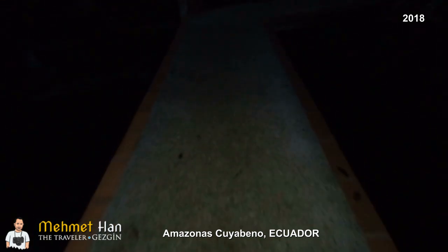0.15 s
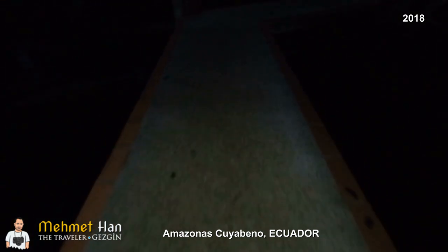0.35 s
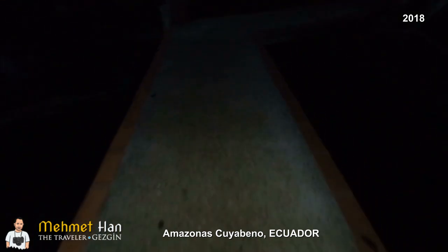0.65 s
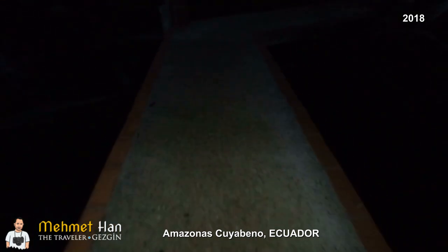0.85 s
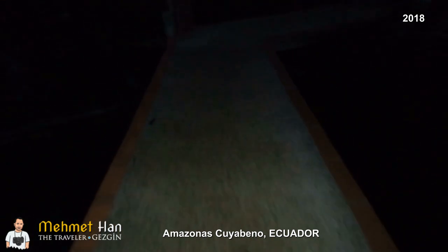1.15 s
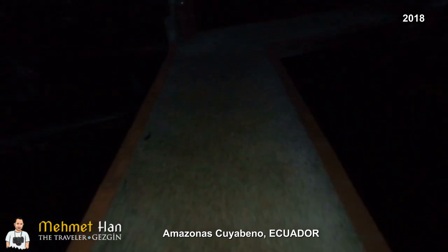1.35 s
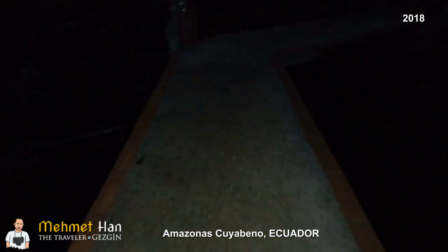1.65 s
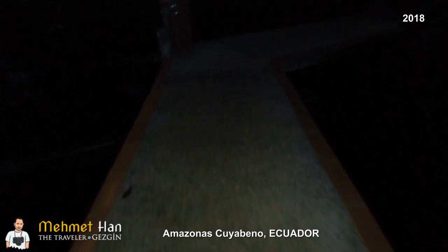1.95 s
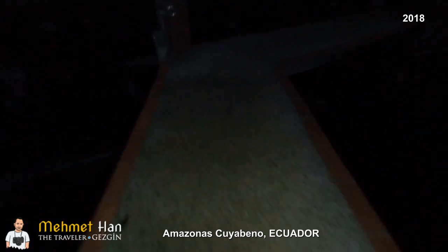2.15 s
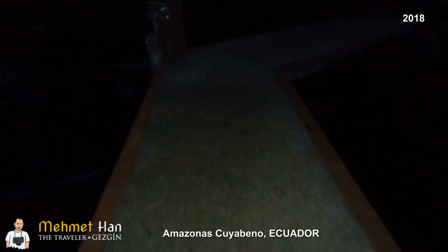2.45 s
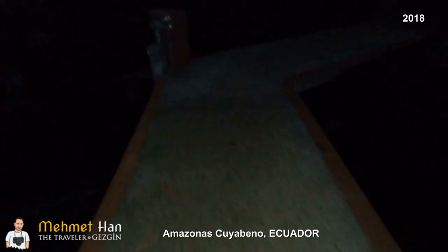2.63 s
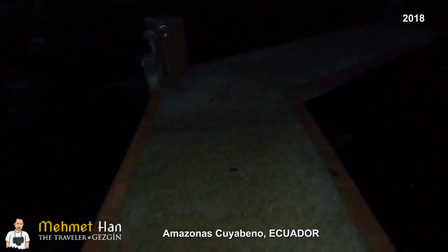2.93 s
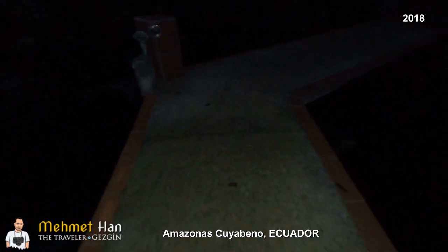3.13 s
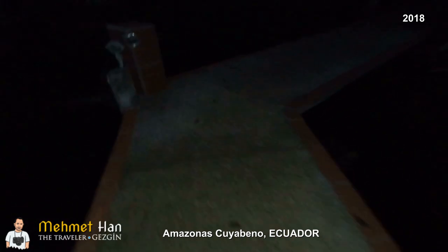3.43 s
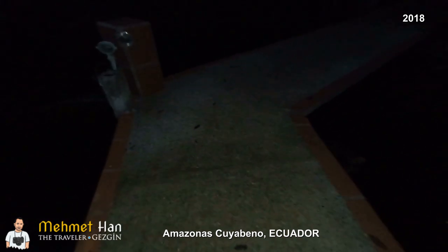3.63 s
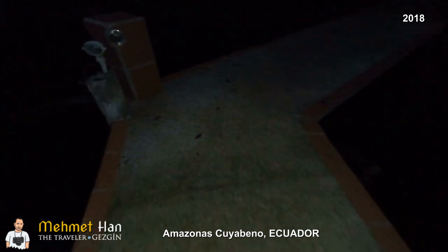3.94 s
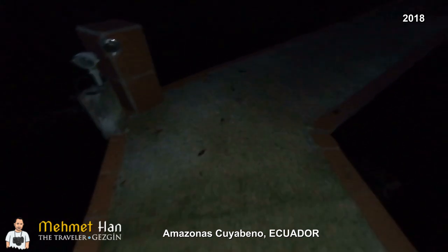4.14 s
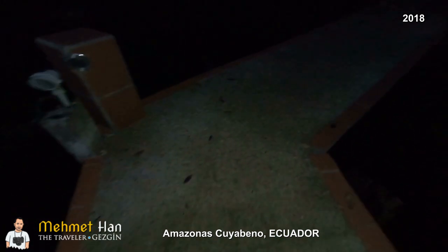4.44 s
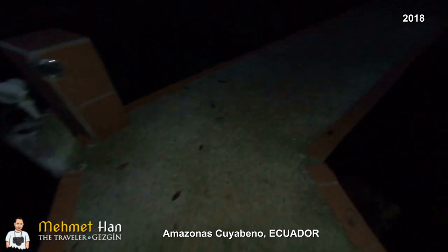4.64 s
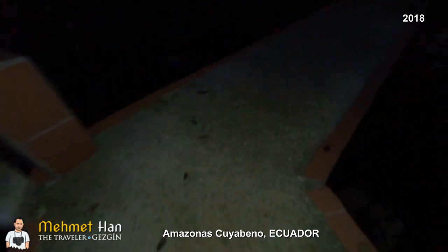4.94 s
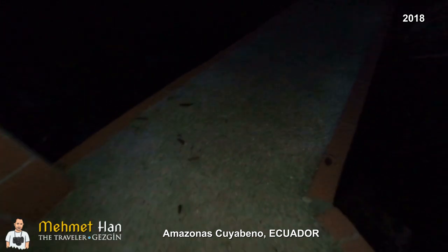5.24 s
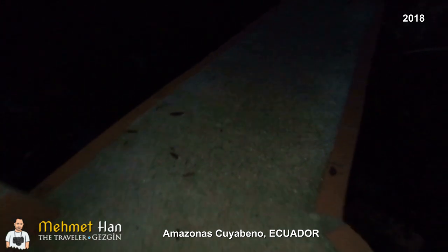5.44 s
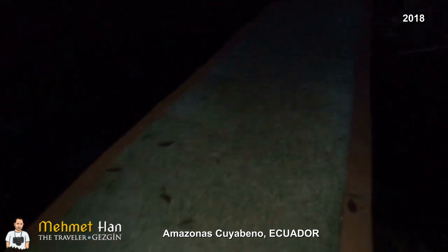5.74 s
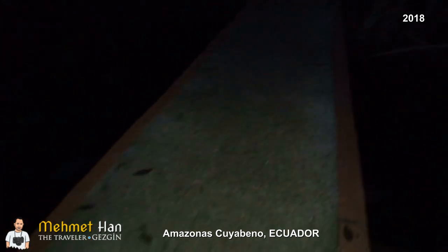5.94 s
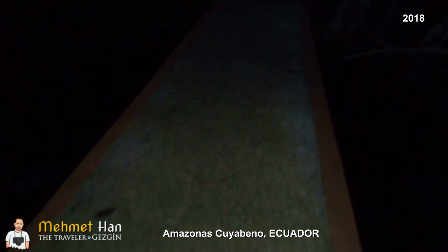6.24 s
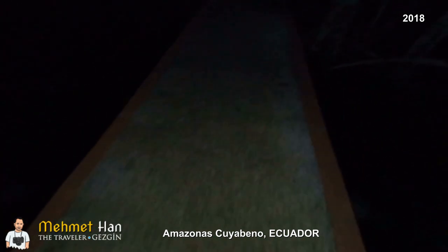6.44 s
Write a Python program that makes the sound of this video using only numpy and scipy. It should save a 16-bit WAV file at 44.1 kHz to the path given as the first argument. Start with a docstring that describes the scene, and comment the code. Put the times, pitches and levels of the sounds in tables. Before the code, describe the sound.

Outdoors in rainforest at night, heard in stereo while walking. Thin insect trills and distant frog notes swell and fade behind closer rasping katydids, quick peeps, brief whistled pairs and a regular clean cricket. Low muffled thuds and housing bumps lean right, heaviest near two seconds; light grit ticks run throughout, with one sharp bright snap shortly before four seconds.

```python
"""In a rainforest at night, crickets, katydids and frogs call near and far over a wash of distant singers.
Far off are shaped noise, thin insect trills, a steady comb-like buzz and overlapping sagging frog notes.
Nearer calls are blurred resonances with a scattered tail; the near cricket is made of clean wing strokes.
A walker carries the recorder along a path: its grip bumps the right microphone, straps and grit tick."""
import sys
import numpy as np
from scipy import signal
from scipy.io import wavfile
from scipy.ndimage import uniform_filter1d

SR = 44100
rng = np.random.default_rng(int(sys.argv[2]) if len(sys.argv) > 2 else 0)


def unload_audio(sound):
    """Save the sound as a 16-bit wav file, at the path given as the first command line argument."""
    columns = np.transpose(np.atleast_2d(sound))
    # keep every value between -1 and 1, then stretch to whole-number steps
    steps = np.round(np.clip(columns, -1, 1) * 32767)
    wavfile.write(sys.argv[1], SR, steps.astype(np.int16))


N = 290178  # length in samples

# Levels of sources are those before panning and before the forest tail is added.
# Spectra of the distant singers, the low air and the treble. Each row: frequency in Hz, relative dB.
FAR_SPECTRUM = [(1380, -68), (2470, -17.5), (2620, -7.5), (2830, -5), (3010, -10.5), (3300, -17),
                (3730, -14.5), (3900, -3), (4230, -3.5), (4540, 1.5), (5200, -9), (5400, -5.5), (5890, 4),
                (6750, 0.5), (7350, -16), (7810, -13.5), (10200, -108)]
AIR_SPECTRUM = [(120, -5.5), (200, -3.5), (387, -13), (538, -14.5), (788, -6.5), (1020, -15), (1430, -19.5),
                (2350, -24.5), (3060, -47.5), (5170, -120)]
TREBLE_SPECTRUM = [(7800, -17), (9300, -1.5), (10500, 12.5), (12600, 8), (15200, -17)]
FAR_DB, AIR_DB, TREBLE_DB = -53, -63, -86.5
PATCHY_DB = 1.8  # drifting louder and softer patches in the far wash and the air
# How alike the washes are at the two microphones. Each row: frequency in Hz, left-right likeness (-1 to 1).
LIKENESS = [(200, -0.33), (600, -0.79), (1100, -0.77), (2300, -0.031), (3900, 0.96), (4600, 0.97),
            (6300, -0.17), (9000, -0.036)]

STRANDS_DB, STRAND_BLUR_HZ = -57.5, 16.3  # distant single insects
DRONE_HZ, DRONE_WIDTH_HZ, DRONE_SPACING_HZ, DRONE_DB = 4942, 300, 71.2, -70
# Thin hisses that swell and fade.
# Each row: start in seconds, level in dB before flutter, length in seconds, pitch in Hz, width in Hz.
HISSES = [(0.811, -70, 0.23, 8200, 2500), (2.09, -68, 0.58, 7640, 690), (3.2, -63, 0.62, 7430, 898),
          (4.019, -64, 0.26, 8800, 2498), (4.103, -66, 0.35, 11700, 2440), (5.414, -70.5, 0.15, 9330, 2940)]
# Path of the far frog chorus. Each row: time in seconds, level in dB, middle pitch in Hz.
FROG_PATH = [(0, -64.5, 2650), (.8, -57, 2743), (1.5, -58.5, 2737), (1.9, -71.5, 2780), (2.6, -53.5, 2694),
             (3, -60, 2731), (3.25, -66, 2680), (4.5, -64.5, 2695), (5.5, -52.5, 2755), (6.05, -65, 2717),
             (6.2, -60.5, 2790)]
# Steady-clocked insect tickers, some fading down or coming up midway.
# Each row: a voice (pitch in Hz, ticks a second, start in turns, gate width in turns,
# blur in Hz, left lead in radians), then its level path (time in seconds, level in dB).
TICKERS = [((4462, 8.73, .1, .3, 22, -.4), [(0, -56), (1.6, -56), (2.2, -59), (6.6, -57.5)]),
           ((4648, 8.74, .18, .3, 22, -.4), [(0, -56), (3.3, -59), (4, -53), (4.8, -53), (5.2, -57),
           (6.6, -57)]), ((5590, 9.65, .4, .95, 90, 1.05), [(0, -51), (1.75, -51), (1.9, -64), (6.6, -66)]),
           ((11700, 9.4, .52, 1.1, 1100, 1.5), [(0, -92), (2.95, -92), (3.2, -78), (6.6, -76)])]

# Ticks of straps and grit. Each row: start in seconds, level in dB, pitch in Hz.
TICKS = [(0.467, -48, 1290), (0.742, -55.5, 1270), (1.257, -53, 900), (1.475, -53.5, 1370),
         (1.958, -50, 880), (2.221, -54.5, 1290), (2.69, -54.5, 800), (2.904, -50.5, 1500),
         (3.481, -46.5, 1340), (3.65, -52.5, 1365), (4.358, -51, 1454), (4.407, -48.5, 1355),
         (4.941, -55, 901), (5.876, -50, 2120), (5.95, -52, 1640), (6.501, -51, 844)]
# Bright snaps. Each row: start in seconds, level in dB, pitch in Hz.
SNAPS = [(.741, -52, 3200), (3.808, -28.5, 4400), (5.927, -49, 3600)]
FAINT_TICKS_DB = (-70, -61)  # range of the many faint ticks scattered throughout
TICK_DAMPING, THUD_DAMPING = 1.7, 0.77  # decay in nepers per cycle
BLIP_AT_S, BLIP_DB, BLIP_START_HZ, BLIP_END_HZ, BLIP_S = 4.353, -53, 640, 930, .062

# Steady hold of the hand on the housing. Each row: time in seconds, level in dB before the lumps.
GRIP_PATH = [(0, -65.5), (1.7, -66), (2.3, -60.5), (5.3, -62), (5.9, -56.5), (6.58, -55)]
# The hand shifts on the housing. Each row: start in seconds, level in dB.
BUMPS = [(.413, -47), (.574, -44), (1.307, -38), (1.42, -38), (1.9, -38.5), (1.993, -21.5), (2.127, -42),
         (2.204, -45), (2.419, -41), (2.565, -44), (2.625, -45), (2.883, -38), (2.956, -44.5),
         (3.08, -46.5), (3.255, -51), (3.411, -48), (3.593, -45), (3.665, -46), (4.07, -40.5), (4.322, -42),
         (4.51, -46.5), (4.61, -50), (4.91, -37.5), (5.46, -35), (5.55, -42), (5.647, -34), (5.715, -41),
         (6.284, -44.5), (6.375, -35)]
# Harder taps on the housing. Each row: start in seconds, level in dB.
KNOCKS = [(2.783, -40.5), (4.812, -40.5), (5.066, -38), (6.041, -38.5)]
# Footfalls jolt the arm. Each row: start in seconds, level in dB, pitch in Hz.
THUDS = [(0.028, -49, 38), (0.649, -52, 35.5), (1.086, -46, 67.6), (1.313, -39.5, 63.5), (1.357, -42, 49),
         (1.99, -21, 104), (2.058, -37, 76), (2.629, -48.5, 60), (3.419, -44, 62), (4.071, -42.5, 69.1),
         (4.209, -44, 70), (5.212, -42, 46.9), (5.673, -37.5, 79), (5.779, -41, 41.2), (5.849, -43, 39.3),
         (6.107, -35.5, 82), (6.278, -44.5, 69), (6.388, -42.5, 59), (6.477, -41.5, 48.7)]
CASE_HZ, CASE_WIDTH_HZ = 143, 28.7  # first housing mode
UPPER_RATIO, UPPER_DB = 1.3, -13  # second housing mode against the first
BUMP_EDGE_DB, KNOCK_EDGE_DB = -19, -2.5  # bright edge against the ring

# Bouts of rasping calls. Each row: start in seconds, level in dB before spread, length in seconds.
RASP_BOUTS = [(.009, -47, .62), (1.161, -47.5, .26), (1.546, -46, .44), (2.428, -47, .62),
              (3.245, -48.5, .62), (4.099, -50.5, .26), (4.637, -48.5, .44), (5.467, -45.5, .09),
              (5.683, -42.5, .09), (6.269, -47.5, .26)]
# Bouts of peeps. Each row: start in seconds, level in dB before spread, length in seconds, base pitch in Hz.
PEEP_BOUTS = [(.06, -54.5, .6, 2608), (.64, -59.5, .9, 2773), (1.05, -62, .5, 2720), (2.2, -46.5, .7, 2787),
              (2.33, -53, .6, 2622), (3.3, -57.5, .7, 2570), (3.535, -53, .8, 2750),
              (4.955, -48.5, .85, 2775)]
# Bouts of hums. Each row: start in seconds, level in dB before spread, length in seconds.
HUM_BOUTS = [(1.218, -59, .28), (5.395, -61, .5)]
# Whistled pairs: a short note, a rest, a longer note. Each row: start in seconds, level in dB.
WHISTLES = [(.748, -49.5), (2.169, -45.5), (3.418, -44), (4.56, -50), (6.105, -52)]
# Single sizzling calls. Each row: start in seconds, level in dB, base pitch in Hz.
SIZZLES = [(.693, -56, 7000), (1.0, -46.5, 6555), (2.161, -46.5, 6650), (2.724, -53.5, 6910),
           (3.123, -53, 6470), (3.441, -42.5, 6570), (4.35, -45, 6710), (5.517, -43.5, 6624)]
# Single croaks. Each row: start in seconds, level in dB, base pitch in Hz.
CROAKS = [(.422, -56, 3900), (.807, -53.5, 3900), (1.401, -54.5, 4050), (1.834, -61, 3990),
          (3.029, -52.5, 3950), (3.47, -51, 3920), (3.834, -51.5, 3917), (5.177, -54.5, 3980),
          (5.398, -50.5, 4075), (5.79, -52, 4094), (6.172, -52, 4080)]
# How each singer calls. Each row: length in seconds, beat in Hz, beat depth (0 to 1), pitch drop in Hz,
# blur in Hz, clear part against the blur, left lead in radians, forest tail in dB,
# and a base pitch in Hz where the calls carry none.
RASP_VOICE = (.125, 48, 1, 0, 35, 1.4, 2.6, -3, 6156)
WHISTLE_VOICE = (.125, 30, .35, 15, 32, 1.4, 1.4, -4, 5790)
SIZZLE_VOICE = (.24, 88, .3, 20, 80, .7, 3.0, -4)
CROAK_VOICE = (.2, 95, .45, 190, 80, 1.3, .3, -1)
PEEP_VOICE = (.085, 70, .3, 120, 35, 1.4, .9, -2)
HUM_VOICE = (.16, 95, 1, -35, 35, .9, .15, -4, 3062)
WHISTLE_SHORT_S, WHISTLE_LONG_AT_S = .05, .066  # length of the first note, start of the second
RASP_EVERY_S, PEEP_EVERY_S, HUM_EVERY_S = .174, .1085, .188  # spacing of calls in a bout
BOUT_SPREAD_DB = -1  # calls of a bout differ a little in strength
CALL_RISE_S, CALL_FALL_S, CALL_FADE_DB = .006, .03, -8

# The near cricket's chirps. Each row: start in seconds, mean level in dB, length in seconds.
CHIRPS = [(0.18, -44, .26), (0.855, -44, .26), (1.555, -41, .31), (2.237, -44, .26), (2.953, -46, .26),
          (3.66, -42.5, .26), (4.34, -45, .26), (5.008, -42.5, .26), (5.701, -42.5, .26), (6.375, -46, .21)]
STROKE_S = .0478  # time from one wing stroke to the next
EDGE_HZ = 15300  # upper band limit


def amp(db):
    """Decibels to amplitude."""
    return 10 ** (np.asarray(db) / 20)


def evened(x):
    """Scales a signal to unit RMS."""
    return x / np.sqrt(np.mean(abs(x) ** 2) + 1e-20)


def tone(turns):
    """A complex carrier from its phase in turns."""
    return np.exp(2j * np.pi * turns)


def curve(rows):
    """Draws each column of a path as straight lines over the whole scene."""
    s, *columns = np.transpose(rows)
    return [np.interp(np.arange(N) / SR, s, c) for c in columns]


def add(mix, s, sound):
    """Lays a stereo sound into the mix at a time, cut at the end."""
    part = mix[:, round(s * SR):][:, :sound.shape[1]]
    part += sound[:, :part.shape[1]]


def wobble(n, width_hz):
    """Complex noise, low-passed twice: the envelope of a narrow band."""
    r = np.exp(-np.pi * width_hz * 1.55 / SR)
    z = rng.standard_normal(n + 4000) + 1j * rng.standard_normal(n + 4000)
    once = signal.lfilter([1], [1, -r], z)
    return evened(signal.lfilter([1], [1, -r], once)[4000:])  # the filter's start-up is cut


def pair(z, pan_db, lead):
    """One source at two microphone ports: left against right in dB, left phase lead in radians."""
    left = (z * np.exp(1j * lead)).real * amp(pan_db / 2)
    return np.array([left, z.real * amp(-pan_db / 2)])


def forest(x, t60=.35):
    """Trunks and leaves scatter a call into a short noisy tail, unlike in each port."""
    t = np.arange(SR // 2) / SR
    tail = rng.standard_normal((2, len(t))) * amp(-60 * t / t60) * (t > .006)
    return signal.fftconvolve(x, tail / np.linalg.norm(tail[0]), axes=1)[:, :N]


def wash(spectrum, db, patchy_db):
    """A wash of noise: random short-time spectra with drifting patches."""
    frames, hz = N // 256 + 5, np.fft.rfftfreq(1024, 1 / SR)
    a, b, c, d, patches = rng.standard_normal((frames, 513, 5)).T
    patches = uniform_filter1d(patches, size=4, axis=0)  # smooth over frequency
    patches = evened(uniform_filter1d(patches, size=16, axis=1))  # then over time
    log_hz = np.log(hz + 1)
    f, level = np.transpose(spectrum)
    level = np.interp(log_hz, np.log(f), level, -99, -99)[:, None]
    f, same = np.transpose(LIKENESS)
    same = np.clip(np.interp(log_hz, np.log(f), same), -1, 1)[:, None]
    left = a + 1j * b
    right = same * left + np.sqrt(1 - same ** 2) * (c + 1j * d)
    z = np.array([left, right]) * amp(level + patchy_db * patches)
    return amp(db) * evened(signal.istft(z, nperseg=1024, noverlap=768)[1][:, :N])


def strands():
    """Many distant insects, each a thin trill at its own pitch and pace that comes and goes."""
    t, out = np.arange(N) / SR, np.zeros((2, N))
    insects = rng.uniform((3750, 8, .3, 0, -1), (3850, 50, 1.5, 1, 2.5), (32, 5))
    for k, (hz, rate, bouts_per_s, turn, lead) in enumerate(insects):
        trill = np.maximum(np.cos(2 * np.pi * rate * t) + 0.53, 0)
        bout = np.maximum(np.cos(2 * np.pi * (bouts_per_s * t + turn)) + 1.3, 0)
        carrier = wobble(N, STRAND_BLUR_HZ) * tone((hz + 100 * k) * t)  # pitches climb by about 100 Hz
        out += pair(trill * bout * carrier, -0.2, lead)
    out = amp(STRANDS_DB) * evened(out)
    return out + forest(out)


def drone():
    """A steady far buzz: a comb of seven thin, fluttering lines, strongest at the centre."""
    t = np.arange(N) / SR
    comb = 0
    for k in range(-3, 4):
        weight = 1 / (1 + (2 * k * DRONE_SPACING_HZ / DRONE_WIDTH_HZ) ** 2)
        comb = comb + weight * wobble(N, 14) * tone((DRONE_HZ + k * DRONE_SPACING_HZ) * t)
    out = pair(amp(DRONE_DB) * comb, -0.33, 1.0)
    return out + forest(out)


def hisses():
    """Wide noise bands under a smooth swell, their noise unrelated in the two ports."""
    out = np.zeros((2, N))
    for s, db, length, hz, width in HISSES:
        n = round(length * SR)
        band = np.array([wobble(n, width) for port in "LR"]) * tone(hz * np.arange(n) / SR)
        flutter = amp(3.3 * wobble(n, 10).real)
        add(out, s, amp(db) * np.hanning(n) ** 0.88 * flutter * band.real)
    return out


def frogs():
    """Several far frogs repeat a short sagging note, each at its own pace, and overlap into one band."""
    db, hz = curve(FROG_PATH)
    t, out = np.arange(N) / SR, np.zeros((2, N))
    for rate, start, offset_hz, lead in rng.uniform((8, 0, -105, -2), (11, 1, 90, 2), (10, 4)):
        place = (rate * t + start) % 1  # position within the note, 0 to 1
        note = np.sin(np.pi * place) ** .8 * (.8 + wobble(N, 32))
        pitch = hz + offset_hz - 110 * (place - .5)
        out += pair(note * tone(np.cumsum(pitch) / SR), -0.96, lead)
    out = amp(db) * evened(out)
    return out + amp(-12.0) * forest(out)


def ticker(voice, level):
    """A blurred resonance swells once on every turn of a steady clock, its level following a path."""
    hz, rate, turn, share, blur_hz, lead = voice
    t = np.arange(N) / SR
    place = (rate * t + turn + .5) % 1 - .5  # turns from the middle of the tick
    gate = np.cos(np.pi * np.clip(place / share, -.5, .5))
    out = pair(amp(curve(level)[0]) * gate * wobble(N, blur_hz) * tone(hz * t), -2.2, lead)
    return out + amp(-3) * forest(out)


def small_things():
    """Short ticks, the main ones each followed by three weaker ones, scattered faint ticks, snaps and a blip."""
    out, t = np.zeros((2, N)), np.arange(800) / SR
    faint = rng.uniform((0, FAINT_TICKS_DB[0], 700), (N / SR, FAINT_TICKS_DB[1], 2000), (30, 3))
    crumbs = []
    for s, db, hz in TICKS:
        for late, less_db, ratio in rng.uniform((.006, -16, .6), (.045, -8, 1.5), (3, 3)):
            crumbs.append((s + late, db + less_db, hz * ratio))
    for s, db, hz in [*TICKS, *crumbs, *faint]:
        decay = TICK_DAMPING * t * hz
        add(out, s, pair(amp(db) * decay * np.exp(1 - decay) * tone(hz * t), -11, 0.09))
    for s, db, hz in SNAPS:
        burst = np.exp(-((t - .001) / .00035) ** 2)
        add(out, s, pair(amp(db) * burst * tone(hz * t), -1, .1))
    t = np.arange(round(BLIP_S * SR)) / SR
    turns = np.cumsum(BLIP_START_HZ + (BLIP_END_HZ - BLIP_START_HZ) * t / BLIP_S) / SR
    shape = amp(BLIP_DB - 10 * t / BLIP_S) * signal.windows.tukey(len(t), .12)
    add(out, BLIP_AT_S, pair(shape * tone(turns), -.5, .1))
    return out + amp(-9) * forest(out, t60=.1)


def grip():
    """A held housing rings at two low modes over a lumpy rumble, mostly in the right port."""
    t = np.arange(N) / SR
    ring = 0
    for ratio, db in ((1, 0), (UPPER_RATIO, UPPER_DB)):
        ring = ring + amp(db) * wobble(N, CASE_WIDTH_HZ) * tone(CASE_HZ * ratio * t)
    rumble = np.array([wobble(N, 35) for port in "LR"]) * tone(40 * t)
    rumble = np.array([0.37 * rumble[0], rumble[1]]).real
    lumps = amp(curve(GRIP_PATH)[0] + 7.1 * wobble(N, 26.0).real)
    return lumps * (pair(amp(-5) * ring, -14.0, -1.1) + rumble)


def handling():
    """Bumps, knocks and footfalls ring down through the housing, mostly to the right port."""
    out = grip()
    t = np.arange(9000) / SR
    rise = 1 - np.exp(-(t / 0.011) ** 2)
    edge = (1 - np.exp(-(t / 0.0028) ** 2)) * np.exp(-250 * t) * tone(245 * t)
    for hits, edge_db in ((BUMPS, BUMP_EDGE_DB), (KNOCKS, KNOCK_EDGE_DB)):
        for s, db in hits:
            turns = CASE_HZ * rng.uniform(0.9, 1.06) * t
            upper = amp(UPPER_DB) * tone((UPPER_RATIO - 1) * turns + rng.random())
            body = rise * np.exp(-55 * t) * tone(turns) * (1 + upper)
            hit = amp(db) * (body + amp(edge_db) * edge)
            add(out, s, pair(hit, -19.0, -1.98 + rng.standard_normal()))
    for s, db, hz in THUDS:
        thud = amp(db) * rise * np.exp(-THUD_DAMPING * hz * t) * tone(hz * t)
        add(out, s, pair(thud, -18, -0.47 + rng.standard_normal()))
    return out


def bouts(rows, every_s):
    """Spells each bout out as evenly spaced calls."""
    calls = []
    for s, db, length, *hz in rows:
        for late in np.arange(0, length, every_s):
            calls.append((s + late, db + BOUT_SPREAD_DB * rng.standard_normal(), *hz))
    return calls


def singer(calls, voice):
    """A wing or throat resonance, beaten by the teeth of a file and blurred by leaves."""
    length, beat_hz, depth, drop_hz, blur_hz, clear, lead, wet_db, *usual_hz = voice
    out, t = np.zeros((2, N)), np.arange(round(length * SR)) / SR
    shape = np.clip(np.minimum(t / CALL_RISE_S, (length - t) / CALL_FALL_S), 0, 1)
    for s, db, *hz in calls:
        pitch = (hz + usual_hz)[0] + drop_hz * (np.exp(-t / 0.035) - .45)
        # full depth splits the line in two
        buzz = evened(1 - depth + depth * np.cos(2 * np.pi * (beat_hz * t + rng.random())))
        z = buzz * evened(clear + wobble(len(t), blur_hz)) * tone(np.cumsum(pitch) / SR)
        add(out, s, pair(amp(db + CALL_FADE_DB * t / length) * shape * z, -2, lead))
    return out + amp(wet_db) * forest(out)


def cricket():
    """The near cricket: clean wing strokes, each sagging a little in pitch."""
    out = np.zeros((2, N))
    t = np.arange(round(0.024 * SR)) / SR
    for s, db, length in CHIRPS:
        for start in np.arange(0, length, STROKE_S):
            size_db, hz, pan_db = rng.standard_normal(3) * (1.5, 7, 1.0) + (db, 4635, -1.2)
            stroke = amp(size_db) * signal.windows.tukey(len(t), .6) * tone(hz * t - 1300 * t ** 2)
            add(out, s + start, pair(stroke, pan_db, 0.082))
    return out + amp(-7) * forest(out)


def scene():
    """The far bed, the sounds at the recorder and the nearer callers together."""
    far = wash(FAR_SPECTRUM, FAR_DB, PATCHY_DB) + wash(AIR_SPECTRUM, AIR_DB, PATCHY_DB)
    far += wash(TREBLE_SPECTRUM, TREBLE_DB, patchy_db=-4.0)
    far += strands() + drone() + hisses() + frogs()
    long_notes = [(s + WHISTLE_LONG_AT_S, db) for s, db in WHISTLES]
    calls = ((bouts(RASP_BOUTS, RASP_EVERY_S), RASP_VOICE),
             (bouts(PEEP_BOUTS, PEEP_EVERY_S), PEEP_VOICE),
             (bouts(HUM_BOUTS, HUM_EVERY_S), HUM_VOICE),
             (WHISTLES, (WHISTLE_SHORT_S, *WHISTLE_VOICE[1:])),
             (long_notes, WHISTLE_VOICE),
             (SIZZLES, SIZZLE_VOICE),
             (CROAKS, CROAK_VOICE))
    near = sum(ticker(*row) for row in TICKERS) + sum(singer(*c) for c in calls) + cricket()
    return far + small_things() + handling() + near


def record(dry):
    """The recorder's band limit: a steep low-pass filter."""
    lowpass = signal.firwin(511, EDGE_HZ, window=("kaiser", 9), fs=SR)
    return signal.oaconvolve(dry, lowpass[None], "same")


dry = scene()
out = record(dry)
unload_audio(out)
```